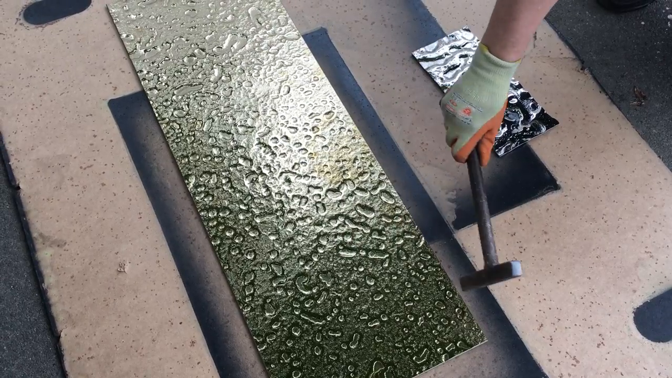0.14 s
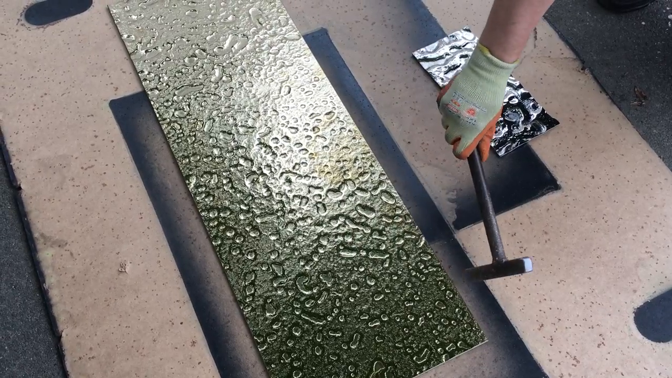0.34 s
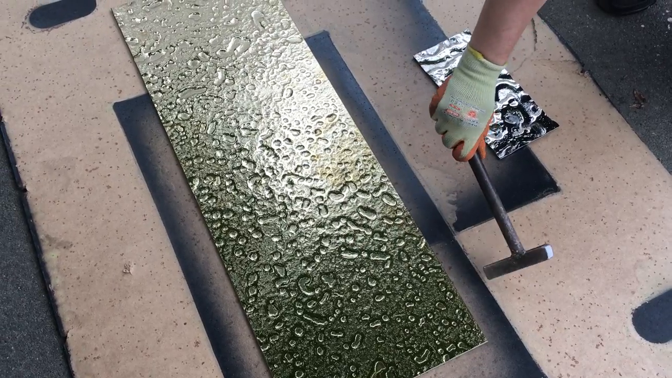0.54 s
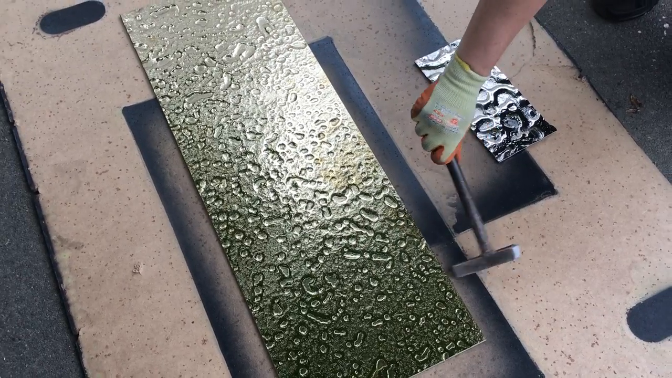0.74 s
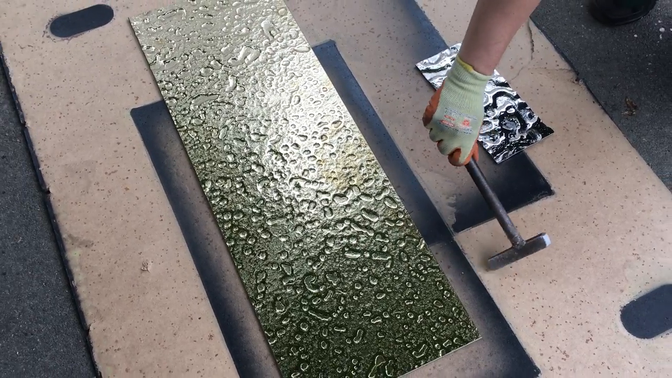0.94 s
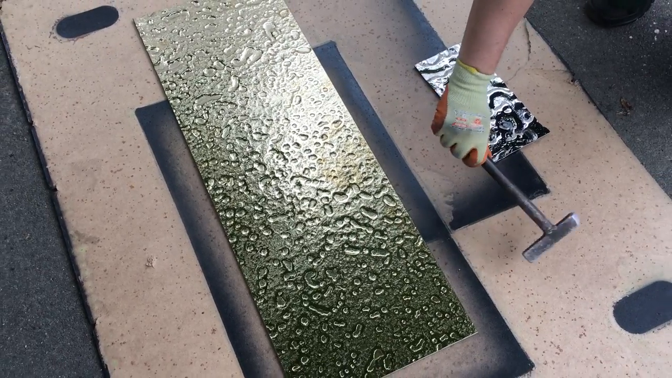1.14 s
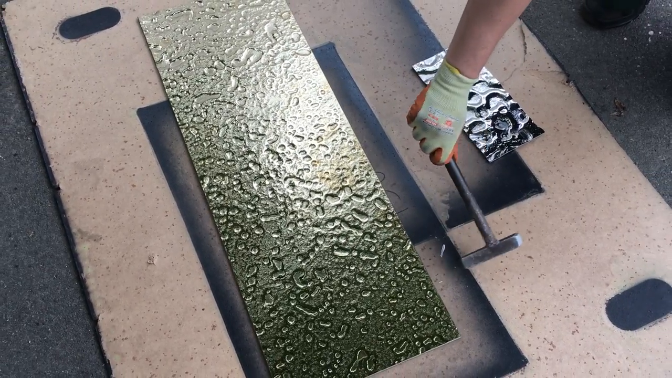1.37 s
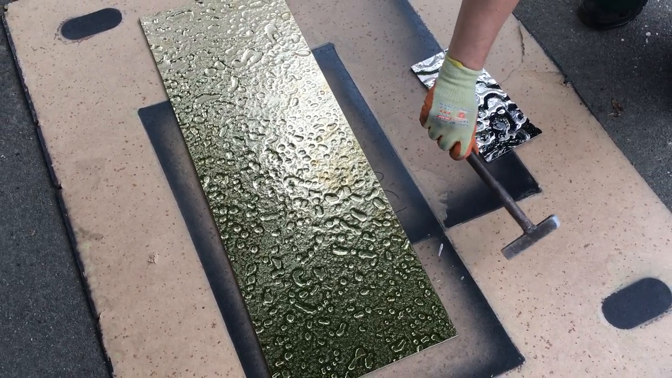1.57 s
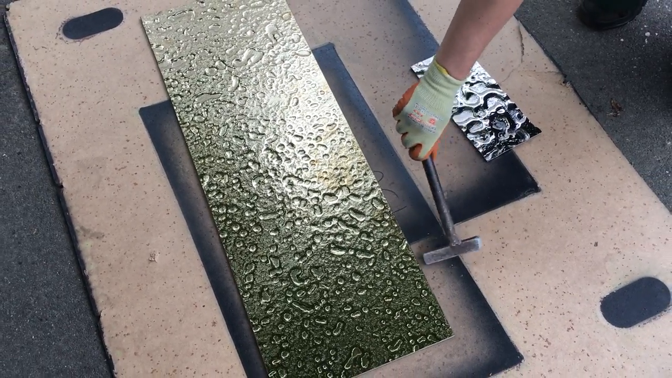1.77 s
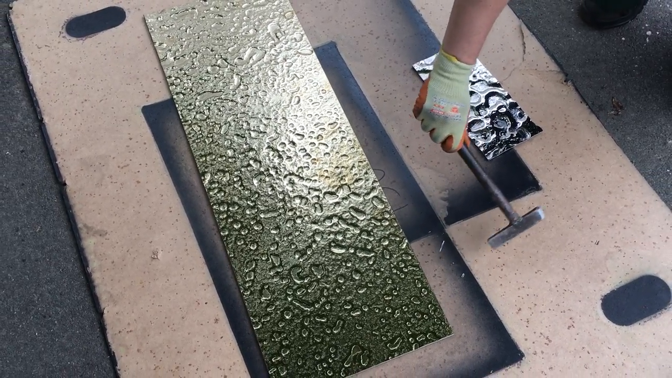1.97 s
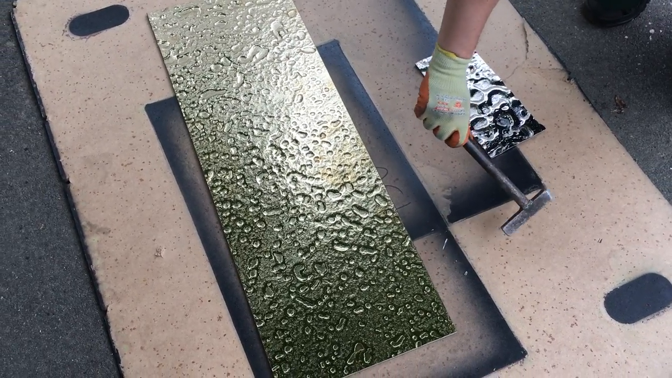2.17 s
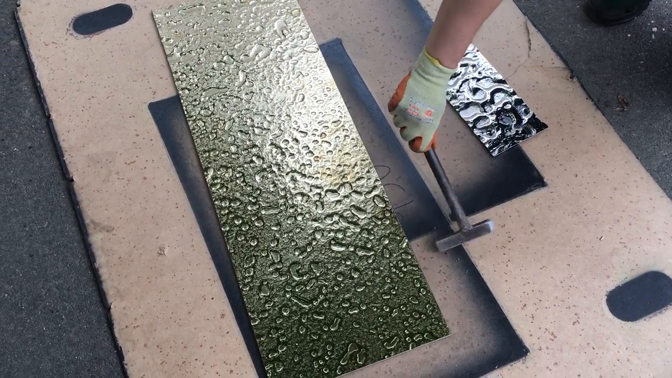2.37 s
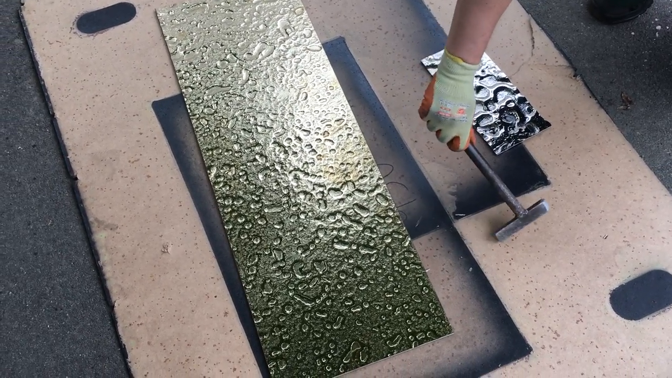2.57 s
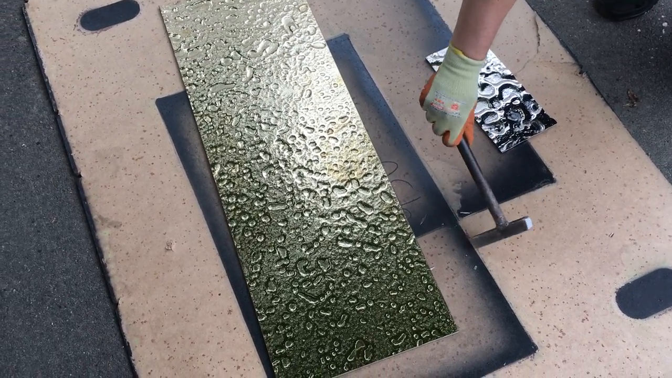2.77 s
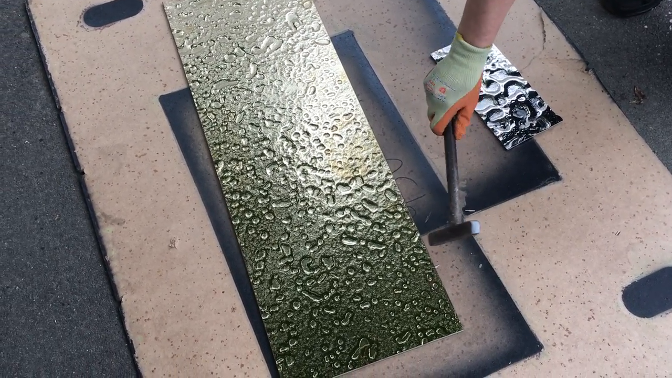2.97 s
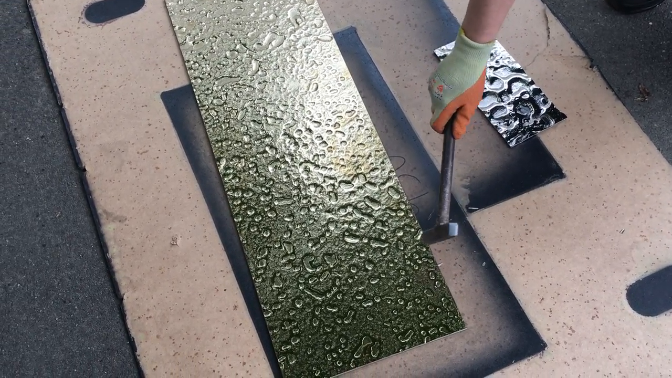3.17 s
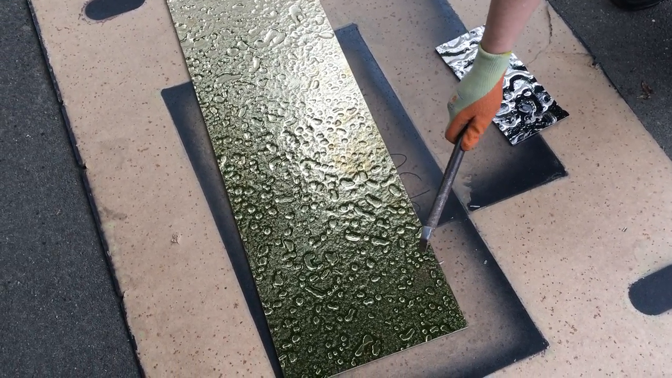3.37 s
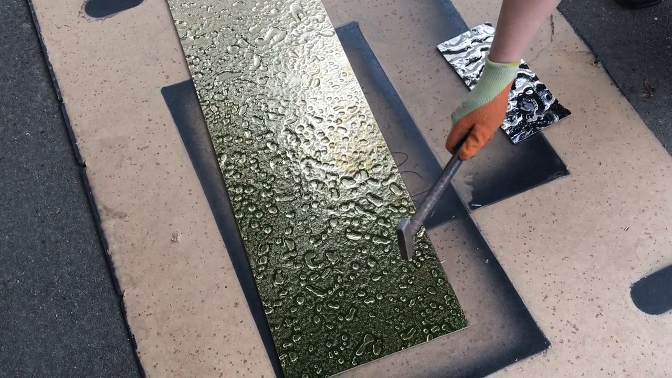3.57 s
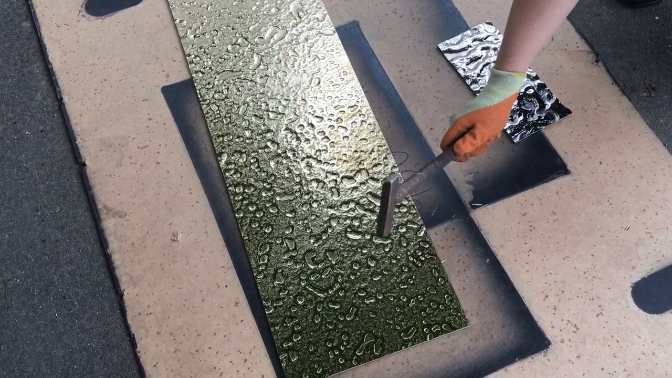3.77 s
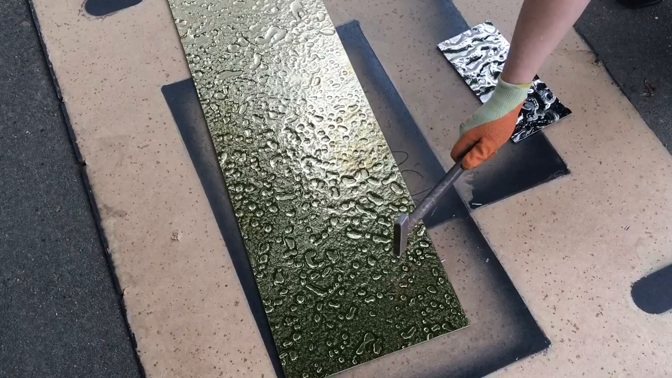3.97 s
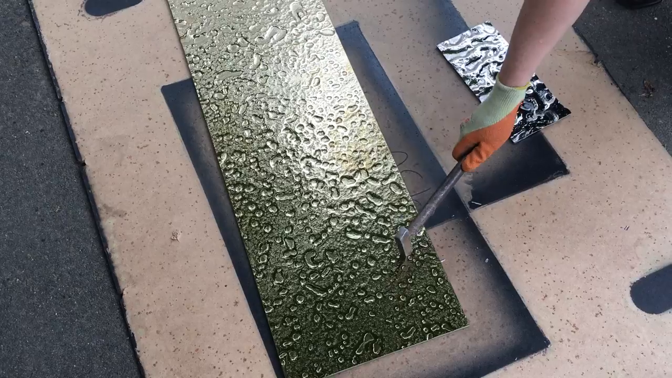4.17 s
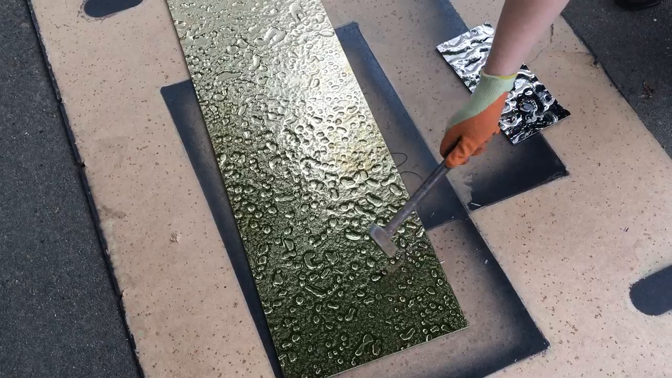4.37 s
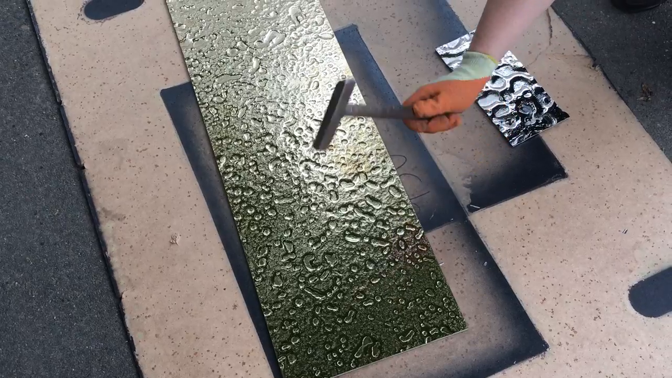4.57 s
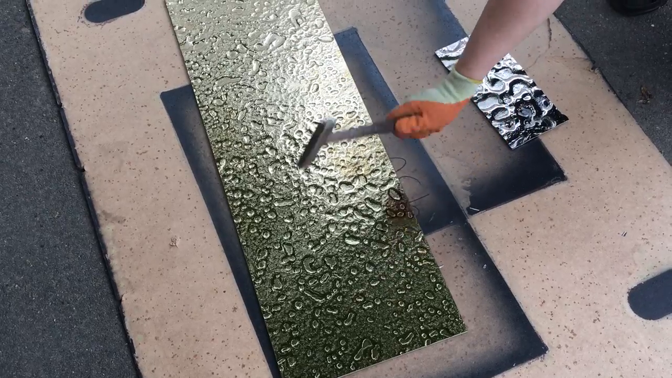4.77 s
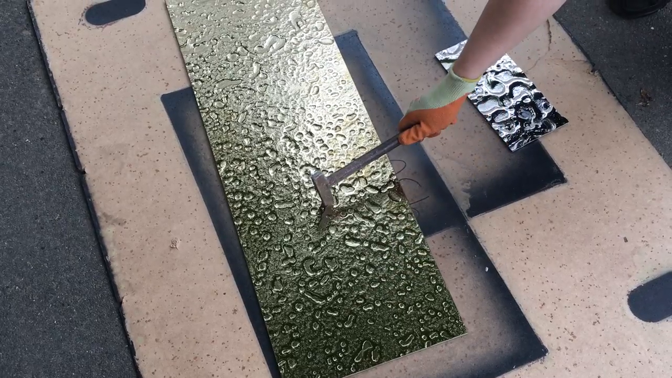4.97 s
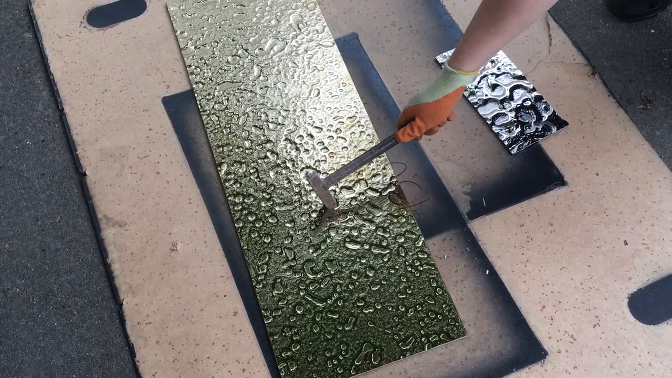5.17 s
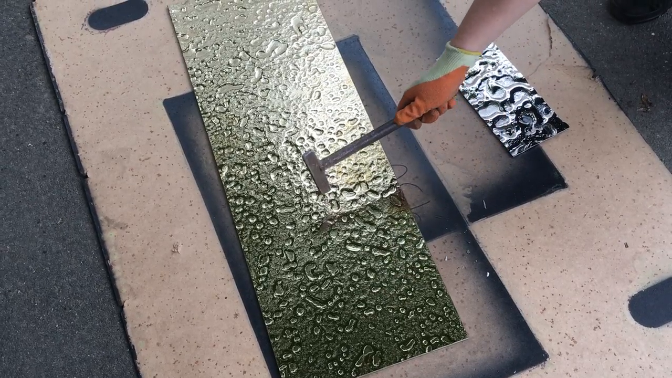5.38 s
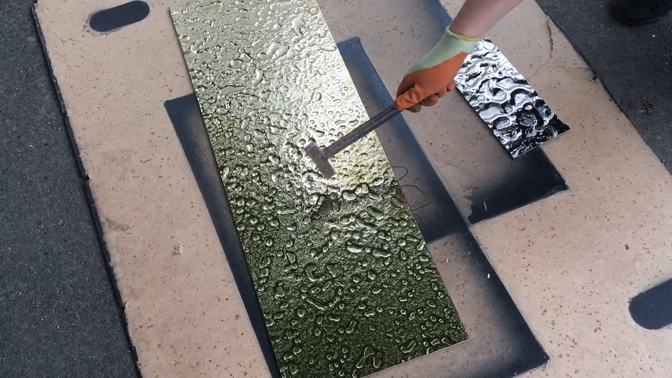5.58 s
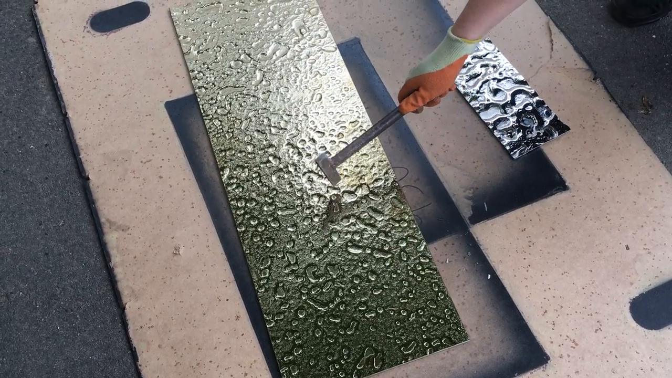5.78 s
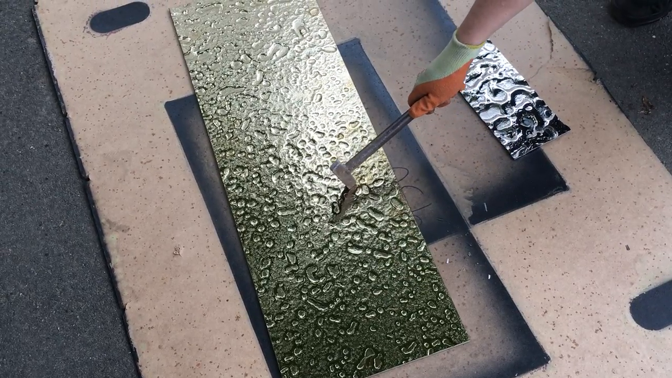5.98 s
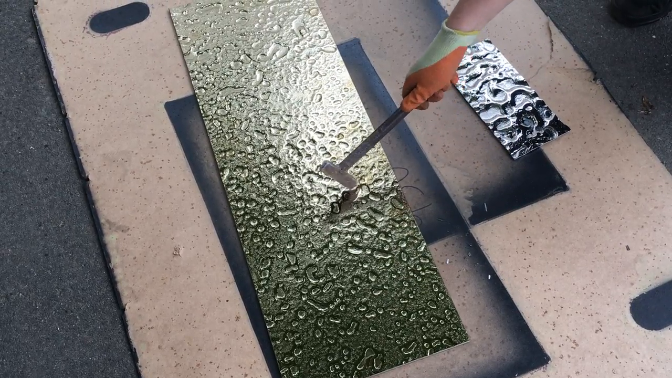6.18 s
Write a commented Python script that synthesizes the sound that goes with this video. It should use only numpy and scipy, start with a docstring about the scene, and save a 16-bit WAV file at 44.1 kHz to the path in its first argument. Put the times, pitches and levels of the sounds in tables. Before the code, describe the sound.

A steel hammer strikes a glass sheet lying on a board, outdoors and close to the microphone, over a faint, steady town rumble. Four blows land at about 0.8, 1.3, 1.8 and 2.4 seconds, each a short thud running into a sharp, glassy clack. From the second blow, the hammer head holds a thin, high, wavering ring that fades by about 3.3 seconds. Tiny chips tick and tinkle faintly around 3 seconds. At 4.1 seconds a harder hit cracks the sheet, with a quick, dry rebound. The loudest blow comes at 4.9 seconds: the glass breaks across with a sharp crack, a brief bright ring, a rapid clatter and a deep puff as the loose piece drops flat. A last, duller knock lands at about 5.9 seconds. Near and distant walls give each blow a light echo.

```python
"""Outdoors over a low town rumble, the microphone is close to a sheet of patterned glass on a board.
A steel hammer strikes seven times, mostly pressing the sheet down with a thud before cracking against it.
Through the first four blows the hammer head sings on; chips tick down and walls answer, near and far.
The fifth cracks the sheet, the sixth breaks it across with a puff that makes the wind guard duck the bass,
and the seventh lands dull. A limiter flattens the peaks of the blows."""
import sys
import numpy as np
from scipy import signal
from scipy.fft import rfft, irfft, next_fast_len
from scipy.io import wavfile
from scipy.ndimage import uniform_filter1d, minimum_filter1d, map_coordinates

SR = 44100
rng = np.random.default_rng(int(sys.argv[2]) if len(sys.argv) > 2 else 0)


def file_out(sig):
    """Save sig as 16-bit WAV at sys.argv[1]."""
    # one column per channel
    cols = np.atleast_2d(sig).T
    # limit, then scale
    lim = np.clip(cols, -1, 1)
    pcm = np.round(lim * 32767).astype(np.int16)
    wavfile.write(sys.argv[1], SR, pcm)


N = 274302

# how long each band lasts in the sheet on its board: (frequency [Hz], relative decay time [ratio])
DAMPING = [(100, 2), (500, 1.1), (2500, 1.5), (7000, 0.94), (15000, 0.7)]


def amp(db):
    return 10 ** (np.asarray(db) / 20)


def clock(count):
    return np.arange(count) / SR


def fade(t, t60):
    """Exponential decay, 60 dB in t60 seconds."""
    return np.exp(-np.log(1000) * t / t60)


def along(points, hz):
    """Read (frequency, value) points on a log frequency axis."""
    knots, values = np.transpose(points)
    return np.interp(np.log(hz + 1), np.log(knots + 1), values)


def curve(points):
    """Read (time, value) points at every sample."""
    return np.interp(clock(N), *np.transpose(points))


def wobble(rate):
    """A smooth random curve, rate knots a second."""
    return map_coordinates(rng.standard_normal(int(N * rate / SR) + 4), [clock(N) * rate])


def add(track, s, sound):
    """Mix a sound in at time s."""
    part = track[round(s * SR):][:len(sound)]
    part += sound[:len(part)]


def lag(x, time):
    """A one-pole follower."""
    keep = np.exp(-1 / (time * SR))
    return signal.lfilter([1 - keep], [1, -keep], x)


def below(x, hz, order):
    """Low-pass without delay."""
    size = next_fast_len(N + SR // 2)
    return irfft(rfft(x, size) / (1 + (np.fft.rfftfreq(size, 1 / SR) / hz) ** order), size)[..., :N]


def noise(spectrum):
    """Steady coloured noise of rms 1."""
    gain = amp(along(spectrum, np.fft.rfftfreq(N, 1 / SR)))
    x = irfft(rfft(rng.standard_normal(N)) * gain, N)
    return x / np.sqrt(np.mean(x ** 2))


def burst(spectrum, t60s, stretch=1, colour=((1, 0),), count=SR // 2):
    """Countless overlapping modes: noise that starts at once and dies band by band."""
    hz, t = np.fft.rfftfreq(count, 1 / SR), clock(count)
    bins = rfft(rng.standard_normal(count)) * amp(along(spectrum, hz))
    bins = bins / irfft(bins, count).std() * amp(along(colour, hz))
    centres, lives = np.transpose(t60s)
    bands = [irfft(bins * along(np.c_[centres, one], hz), count) for one in np.eye(len(centres))]
    return sum(band * fade(t, life * stretch) for band, life in zip(bands, lives))


def ring(modes, scatter_db, colour=((1, 0),), count=SR // 2):
    """Damped modes, excited a little differently each time."""
    t = clock(count)
    hz, db, t60 = np.transpose(modes)
    gain = amp(db + along(colour, hz) + scatter_db * rng.standard_normal(len(hz)))
    phase = rng.uniform(0, 2 * np.pi, (len(hz), 1))
    return gain @ (np.sin(2 * np.pi * hz[:, None] * t + phase) * fade(t, t60[:, None]))


def swell(attack):
    """A soft start for a ring."""
    return 1 - np.exp(-clock(SR // 2) / attack)


def push(hz, t60):
    """A heavily damped swing."""
    t = clock(SR // 2)
    return np.sin(2 * np.pi * hz * t) * fade(t, t60)


def town():
    """Far off: a steady low rumble, a wavering machine drone and a faint wash of air."""
    # spectra of the town and the air: (frequency [Hz], density [dB])
    rumble_spectrum = [(15, -24.5), (30, -15.5), (52, -2), (70, -2), (115, 0), (150, -12.5), (220, -17.5),
                       (320, -17.5), (420, -30.5), (900, -59.5)]
    air_spectrum = [(150, -34), (250, -7.5), (342, -11), (410, -15.5), (620, -7), (830, -12), (1200, -12),
                    (2900, -24), (4400, -27), (5000, -33.5), (9000, -44), (16000, -56.5)]
    # tones of a distant machine: (frequency [Hz], level re rumble [dB])
    machine_tones = [(121, -4), (306, -20.5), (344, -17.5), (539, -24.5), (630, -21.5)]
    drone = np.zeros(N)
    for hz, db in machine_tones:
        level = amp(db + 0.76 * wobble(6.6))
        drone += level * np.sin(2 * np.pi * np.cumsum(hz + 2.5 * wobble(7)) / SR)
    rumble = amp(0.76 * wobble(3.1)) * noise(rumble_spectrum)
    return amp(-43) * (rumble + drone) + amp(-56.5) * noise(air_spectrum)


def echo(x, colour, t60s, delay, rise, level_db):
    """A diffuse answer that sets in after a delay, different for each half second."""
    out, size = np.zeros(N), SR // 2
    for start in range(0, N, size):
        tail = burst(colour, t60s, count=2 * SR // 3)
        tail *= 1 - np.exp(-clock(len(tail)) / rise)
        tail *= amp(level_db) / np.linalg.norm(tail)
        add(out, start / SR + delay, signal.fftconvolve(x[start:start + size], tail))
    return out


def walls(x):
    """Near walls answer the microphone almost at once; far ones later, fainter and duller."""
    # tone of the reflections: (frequency [Hz], level [dB])
    near_colour = [(100, -8.5), (400, 6.5), (1500, 3), (3000, 1), (6000, 1), (14000, -3.5)]
    far_colour = [(100, -18.5), (500, 2.5), (2000, 2.5), (5000, -2), (9000, -13), (14000, -28)]
    # their decay: (frequency [Hz], t60 [s])
    near_t60 = [(200, 0.33), (2000, 0.46), (7000, 0.3), (14000, 0.33)]
    far_t60 = [(200, 0.8), (2000, 0.9), (10000, 0.93)]
    near = echo(x, near_colour, near_t60, delay=0.025, rise=0.0087, level_db=-25)
    far = echo(x, far_colour, far_t60, delay=0.23, rise=0.013, level_db=-45)
    return near + far


def chips():
    """Small cracks run; chips land and tinkle."""
    # chips and small cracks, then chips that ring: (time [s], level [dB])
    ticks = [(1.531, -62.5), (1.662, -69.5), (1.723, -69.5), (2.708, -55.5), (2.968, -68), (3.028, -72),
             (3.070, -60), (4.098, -38), (4.356, -53), (4.676, -42.5), (4.875, -23.5), (6.199, -67)]
    tinkles = [(2.707, -73), (3.028, -74), (3.068, -75.5), (3.155, -69)]
    # spectrum of a tick: (frequency [Hz], density [dB])
    chink = [(100, -22.5), (700, 0.5), (2500, -4.5), (7000, -8.5), (16000, -9.5)]
    # modes of a loose chip: (frequency [Hz], level [dB], t60 [s])
    chip_modes = [(9470, 7, 0.35), (11240, -3.5, 0.21), (12300, -8, 0.18)]
    out = np.zeros(N)
    for s, db in ticks:
        treble_db = 0.29 * (-39 - db)  # smaller is brighter
        add(out, s, amp(db) * burst(chink, DAMPING, stretch=0.11, colour=[(2500, 1.9), (7000, treble_db)]))
    for s, db in tinkles:
        add(out, s, amp(db) * ring(chip_modes, scatter_db=-7.5))
    return out


def hammer_head():
    """The steel head sings on; tilting swings its four lobes towards and away from the microphone."""
    # blows that set it singing: (time [s], level [dB])
    sings = [(0.835, -64.5), (1.322, -30), (1.838, -32.5), (2.394, -31.5)]
    # its tilt in the hand, away from a silent direction: (time [s], angle [degrees])
    tilt = [(1.3, -27), (1.39, -13), (1.43, 32), (1.49, 8), (1.58, 17.5), (1.81, 4.5), (2.12, -28),
            (2.33, -1.5), (2.44, 27), (2.53, 48), (2.56, 5.5), (2.71, 6.5), (2.825, -1), (2.88, -21.5),
            (3.25, -3)]
    # its faint lower mode: (time [s], level [dB])
    faint_ring = [(2.6, -94), (2.98, -68), (3.2, -68.5), (3.35, -88), (3.48, -62), (3.7, -73), (3.95, -90)]
    head_hz, waver_hz, silent_at_s, fade_s = 5655, 3.6, 3.32, 0.29
    t, strength = clock(N), np.zeros(N)
    for s, db in sings:
        strength = np.where(t < s, strength, amp(db) * fade(t - s, t60=5.2))
    strength = lag(strength, time=0.015) * np.clip((silent_at_s - t) / fade_s, 0, 1)
    direct = np.sin(2 * np.radians(curve(tilt)))
    via_ground = amp(-19.5) * (wobble(22) + 1j * wobble(22))
    phase = 2 * np.pi * np.cumsum(head_hz + waver_hz * wobble(4.8)) / SR
    flutter = amp(1.5 * wobble(30))
    main = strength * flutter * np.real((direct + via_ground) * np.exp(1j * phase))
    low = amp(curve(faint_ring) + 1.56 * wobble(15)) * np.sin(2 * np.pi * 4296 * t)
    return main + low * (t > faint_ring[0][0]) * (t < faint_ring[-1][0])


def thuds():
    """The sheet bends and slaps the board, too damped to ring."""
    # the sheet pressed or nudged down: (time [s], slap level [dB])
    presses = [(0.773, -30.5), (1.3005, -18.5), (1.8165, -16.5), (2.3645, -20.5), (2.760, -43),
               (4.797, -48), (4.912, -26.5), (5.447, -45), (5.943, -15)]
    # spectrum of the slap: (frequency [Hz], density [dB])
    slap = [(40, -18), (200, -0.5), (800, 9), (1400, 0), (2400, -5), (4000, -23.5), (9000, -34.5),
            (16000, -45.5)]
    knee_db, growth = -32, 1.49  # the bending thud outgrows the slap above the knee
    out, bend = np.zeros(N), push(hz=365, t60=0.042)
    for s, slap_db in presses:
        bend_db = knee_db + growth * (slap_db - knee_db)
        add(out, s, amp(bend_db) * bend + amp(slap_db) * burst(slap, DAMPING, stretch=0.11))
    return out


def strains():
    """Short tones that grow up to a crack and stop with it."""
    # the tones: (peak time [s], level [dB], frequency [Hz], rise [s])
    tones = [(4.120, -24, 3060, .005), (4.897, -12, 3130, .0055), (4.895, -4, 500, .0045)]
    out, t = np.zeros(N), clock(SR // 10) - 0.05
    for s, db, hz, rise in tones:
        shape = np.exp(np.minimum(t / rise, -t / 0.004))
        add(out, s + t[0], amp(db) * shape * np.sin(2 * np.pi * hz * t))
    return out


def fracture():
    """The sheet parts: the loose piece rings and drops flat with a deep puff."""
    # modes of that piece: (frequency [Hz], level [dB], t60 [s])
    shard_modes = [(5420, -15, .11), (6540, -7, .14), (6620, -14, .12), (7850, -18, .12), (9022, -10, .13),
                   (9190, -16, .11), (9900, -21, .13)]
    out = np.zeros(N)
    add(out, 4.899, amp(3) * ring(shard_modes, scatter_db=-3) * swell(0.0032))
    puff = (amp(-13.5) * push(hz=43.5, t60=0.13)
            + amp(-8) * push(hz=69, t60=0.098)
            + amp(-10.5) * push(hz=159, t60=0.1343))
    add(out, 4.908, puff * swell(0.0023))
    return out


def overtones(t60, count):
    """A plate's modes lie evenly dense in frequency; each striking place wakes another set."""
    # outline of the sheet's many weak modes: (frequency [Hz], level [dB])
    outline = [(3000, -24.5), (5000, -31.5), (6500, -24), (8500, -20), (10000, -29), (12000, -32.5),
               (16000, -44)]
    detune, life = rng.standard_normal((count, 2)).T
    hz = np.linspace(3300, 15700, count) + 40 * detune
    return np.c_[hz, along(outline, hz), t60 * np.exp(0.15 * life)]


def contact(db, knock_db, bite_db, treble_db, decay, ring_db, low_db):
    """Steel on glass: a snap, the dense clack of the sheet, its clear modes and the board below."""
    # spectra of the impact: (frequency [Hz], density [dB])
    snap_spectrum = [(300, -25.5), (1200, -3.5), (2400, 1), (3500, -5.5), (8000, -15), (16000, -31)]
    clack_spectrum = [(30, -46), (150, -20), (280, 3), (450, -5), (800, 6.5), (1100, -4), (1700, -3.5),
                      (2500, -6.5), (3600, -11.5), (6000, 1), (9000, -14.5), (11000, -25.5), (16000, -26.5)]
    # modes of sheet and board: (frequency [Hz], level [dB], t60 [s])
    glass_modes = [(1444, -9, .28), (2662, -21, .22), (2939, -14, .2), (3612, -28, .24), (4492, -3, .16),
                   (5135, -19, .2), (5245, -16, .19), (5652, -13, .12), (6175, -11, .12), (6377, -22, .2),
                   (6519, -13, .17), (6786, -12, .18), (7079, -4, .16), (7365, -12, .09), (7682, -6, .16),
                   (7865, -17, .18), (7913, -9, .12), (8416, -12, .16), (8545, -17, .18), (8626, -23, .25),
                   (9084, -17, .17), (9577, -13, .15), (10090, -22, .15), (10400, -23, .11),
                   (10970, -25, .13), (11255, -23, .15), (13240, -29, .14), (14800, -33, .17)]
    board_modes = [(276.2, -11.5, .13), (309.1, -16.5, .14), (364, -13, .14), (429, -21, 0.06),
                   (557.5, -16, .16), (719, -18, 0.14), (836, -15, 0.11), (1216, -9, 0.063)]
    hardness = [(350, knock_db), (1100, 0.009), (2300, bite_db),
                (4500, treble_db), (14000, 1.8 * treble_db)]
    snap = amp(3.5) * burst(snap_spectrum, t60s=[(1000, 0.025)], colour=hardness)
    clack = amp(-4) * burst(clack_spectrum, DAMPING, decay, hardness)
    shimmer = ring(overtones(1.1 * decay, count=100), scatter_db=5, colour=hardness) * swell(0.0028)
    # the place struck decides which modes speak: 4.5 kHz gains where the lowest loses
    place = [(1444, low_db), (4492, -4.5 - 0.98 * low_db), (7000, -0.92)]
    glass = amp(ring_db) * ring(glass_modes, scatter_db=1, colour=place) * swell(0.0087)
    board = amp(knock_db) * ring(board_modes, scatter_db=3.5) * swell(0.0033)
    return amp(db) * (snap + clack + shimmer + glass + board)


def blows():
    """Close up, each blow rings sheet and hammer; where the sheet cracks through, it rebounds."""
    # hammer blows; those near the edge let the sheet ring: (time [s], level [dB], knock [dB], bite [dB],
    # treble [dB], base decay [s], ring [dB], lowest mode re ring [dB])
    strikes = [(0.835, -6.5, 1.5, -0.5, -4.5, 0.12, -16.5, 5.5),
               (1.323, -3.5, -0.5, 3, 1, 0.056, -3.5, 1.5), (1.838, -6, -1.5, 2.5, -2, 0.075, -3.5, -6.5),
               (2.392, -4.5, -2.5, 0, -1, 0.089, -3, -10.5),
               (4.120, -1.5, 0.5, 2, -0.5, 0.077, -19.5, -10.5), (4.898, 3.5, 2, 1.5, 1, 0.078, -20, -7.5),
               (5.943, -7.5, 2.5, 1, -2, 0.071, -36, 3)]
    # lasting modes of the hammer: (frequency [Hz], level [dB], t60 [s])
    steel_modes = [(2945, -52.5, 1.3), (4490, -49, 1.6), (7682, -59.5, 0.59), (8700, -52, 0.85)]
    # the cracked sheet falls back against the steel, dry and hard: (time [s], level [dB])
    rebounds = [(4.142, -13.5), (4.167, -22), (4.923, -8), (4.934, -5.5)]
    out = np.zeros(N)
    for s, db, knock_db, bite_db, treble_db, decay, ring_db, low_db in strikes:
        add(out, s, contact(db, knock_db, bite_db, treble_db, decay, ring_db, low_db))
        add(out, s, amp(db + ring_db) * ring(steel_modes, scatter_db=0, count=3 * SR // 2))
    for s, db in rebounds:
        clack = contact(db, knock_db=-1, bite_db=1.5, treble_db=-3, decay=0.076, ring_db=-25, low_db=-4)
        add(out, s, clack)
    return out


def wind_guard(x):
    """A deep puff at the microphone turns the bass down; the cut holds, then slowly lets go."""
    threshold_db, hold_s, recovery_db_per_s, upper_share = -39, 0.1, 29, 0.15
    deep_db = 10 * np.log10(lag(below(x, hz=131, order=8) ** 2, time=0.024) + 1e-12)
    needed_db = np.minimum(0, threshold_db - deep_db)
    half = int(hold_s * SR / 2)
    held_db = minimum_filter1d(needed_db, 2 * half + 1, origin=half)
    climb_db = recovery_db_per_s * clock(N)
    cut_db = lag(np.minimum.accumulate(held_db - climb_db, axis=-1) + climb_db, time=0.11)
    bass = below(x, hz=264, order=4)
    return bass * amp(cut_db) + (x - bass) * amp(upper_share * cut_db)


def limiter_cut(x, ceiling, hold, release):
    """Gain to take away in dB: it jumps just ahead of each peak and falls 20 dB per release time."""
    size = int(hold * SR)
    needed_db = minimum_filter1d(np.minimum(0, 20 * np.log10(ceiling / (np.abs(x) + 1e-9))), size)
    climb_db = 20 * clock(N) / release
    return -uniform_filter1d(np.minimum.accumulate(needed_db - climb_db, axis=-1) + climb_db, size)


def scene():
    """At one microphone: glass and hammer close by, walls around, the town beyond."""
    glass = blows() + thuds() + strains() + chips() + fracture()
    return (glass + walls(glass) + hammer_head() + town())[None]


def record(dry):
    """The recorder: wind guard, fast limiter, rounded peaks, then the band limit."""
    start_db, settle_s = -12, 0.55  # the gain starts low and settles
    guarded = wind_guard(dry) * amp(start_db * np.exp(-clock(N) / settle_s))
    fast_db = limiter_cut(guarded, ceiling=0.9, hold=0.002, release=0.025)
    slow_db = 16 * lag(lag(fast_db, time=0.05), time=0.67)  # overloads keep the gain down a while
    limited = guarded * amp(-fast_db - slow_db)
    rounded = limited / (1 + np.abs(limited / 0.63) ** 6) ** (1 / 6)
    return below(rounded, hz=16050, order=200)


dry = scene()
out = record(dry)
file_out(out)
```